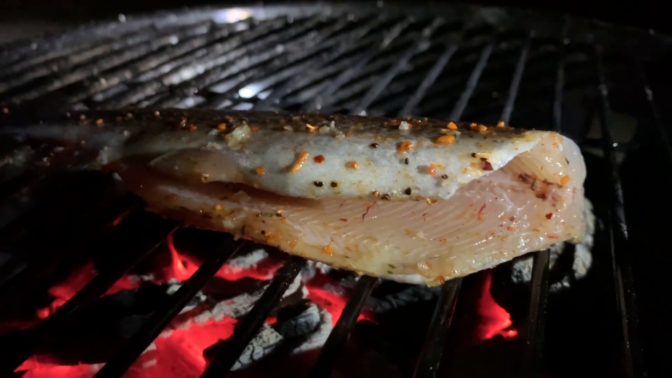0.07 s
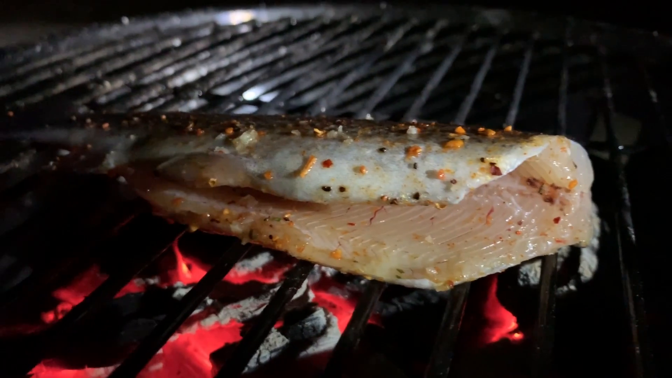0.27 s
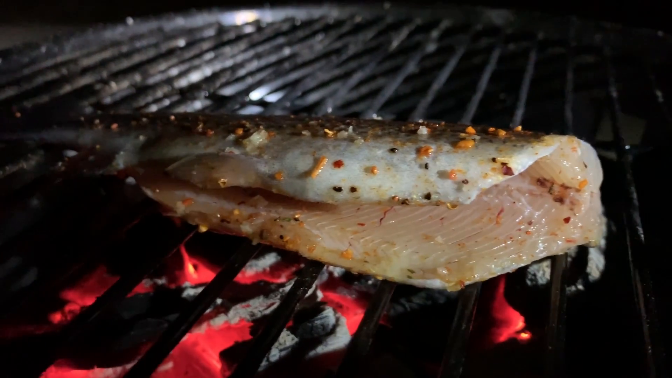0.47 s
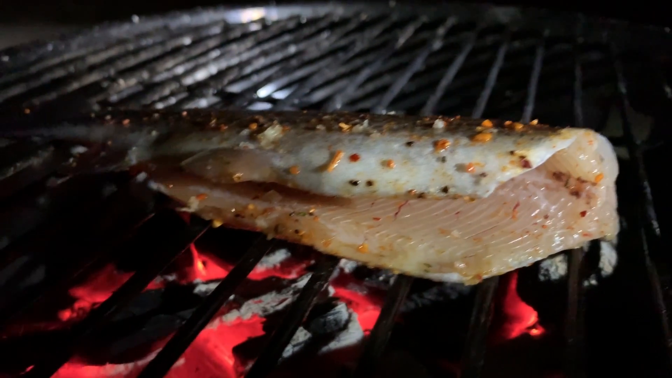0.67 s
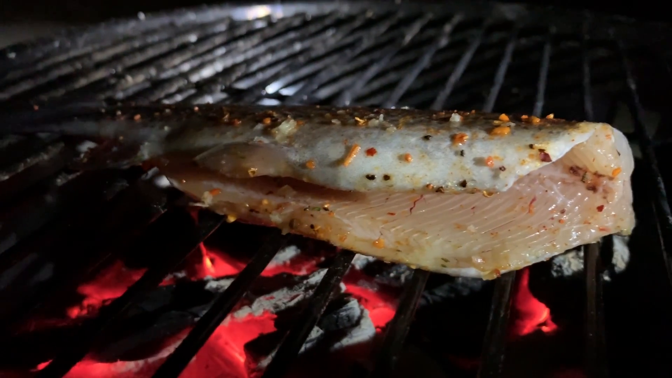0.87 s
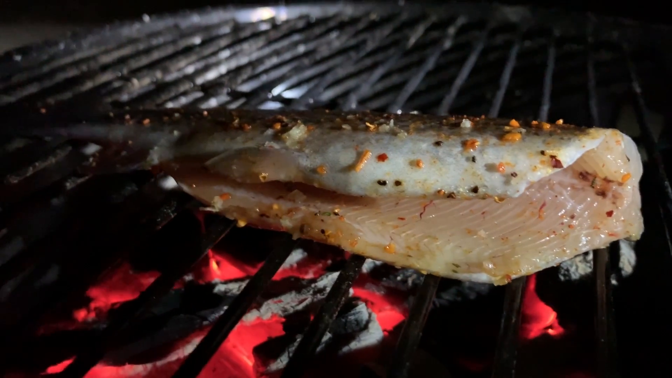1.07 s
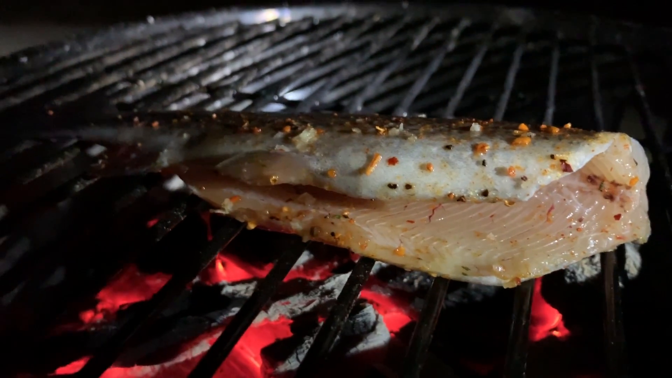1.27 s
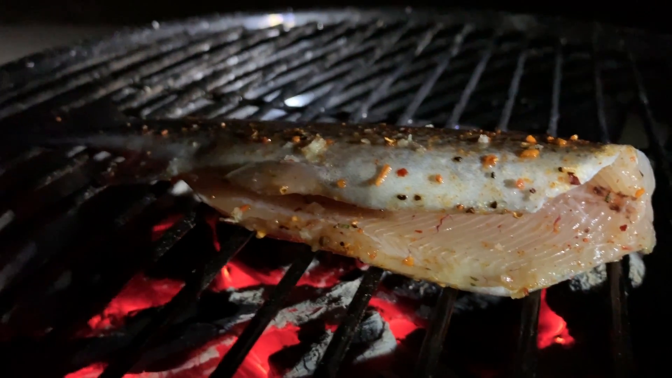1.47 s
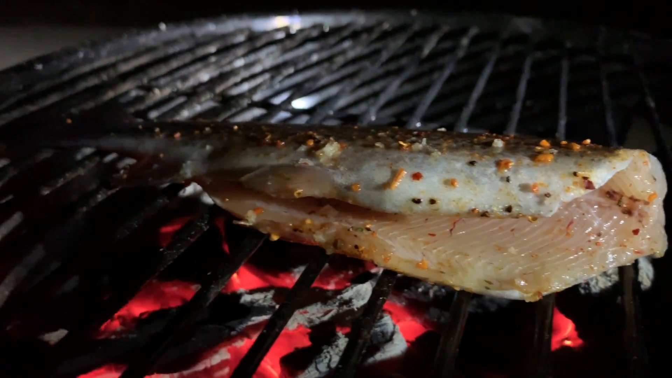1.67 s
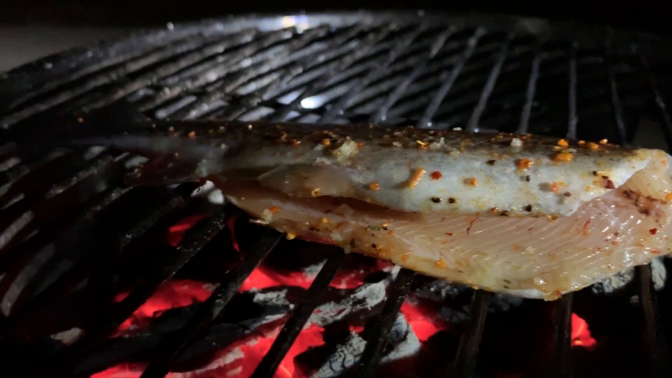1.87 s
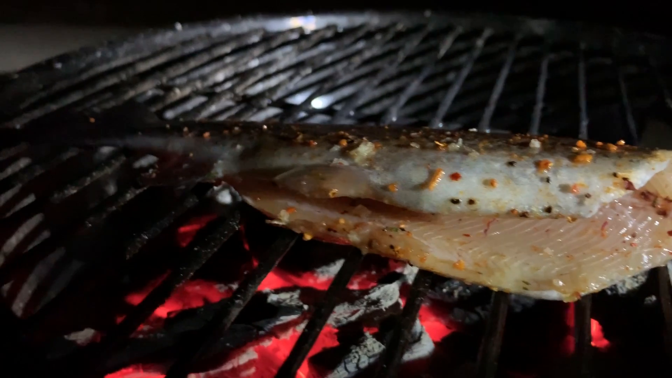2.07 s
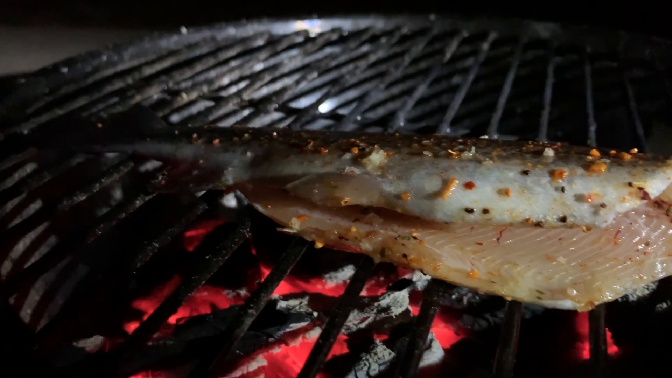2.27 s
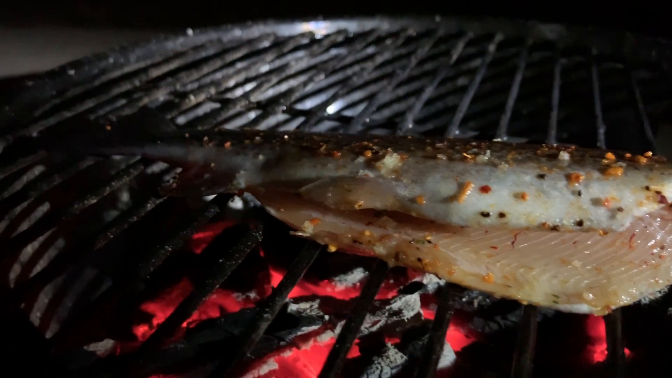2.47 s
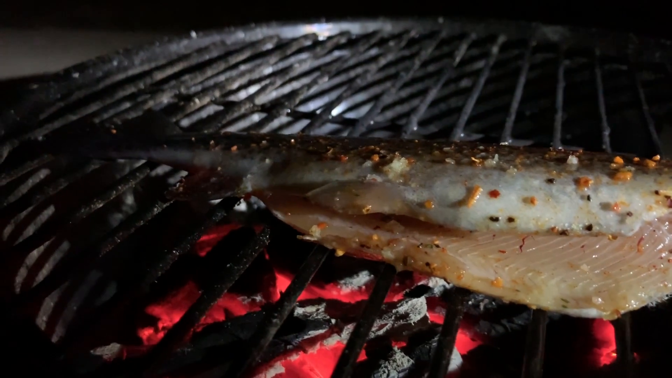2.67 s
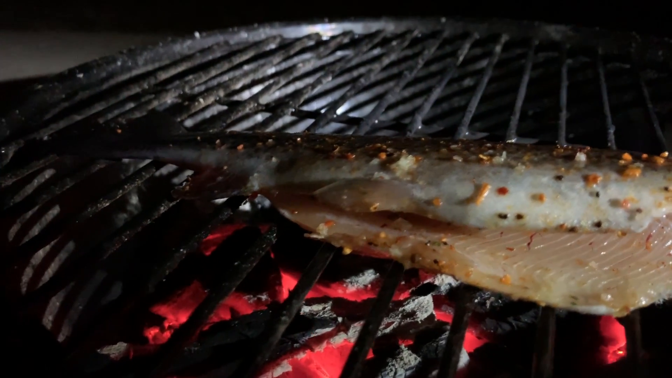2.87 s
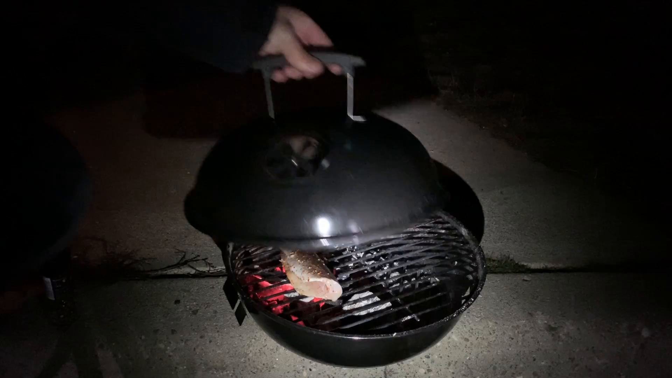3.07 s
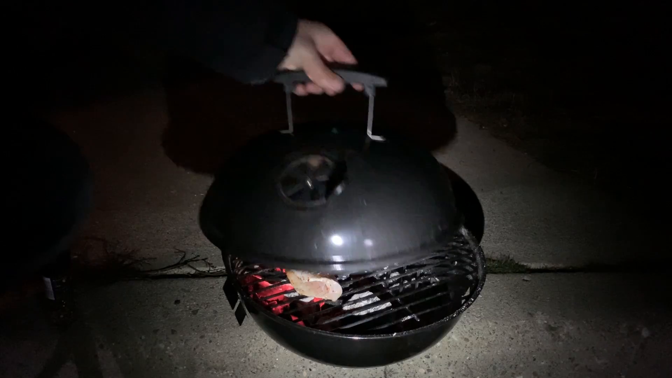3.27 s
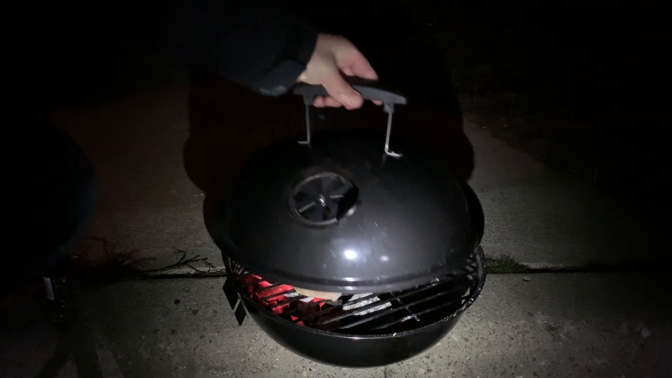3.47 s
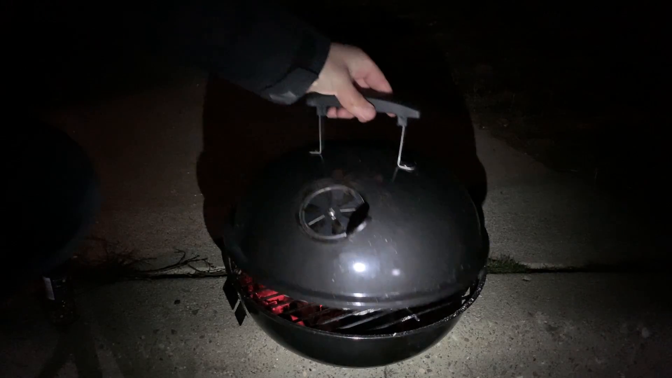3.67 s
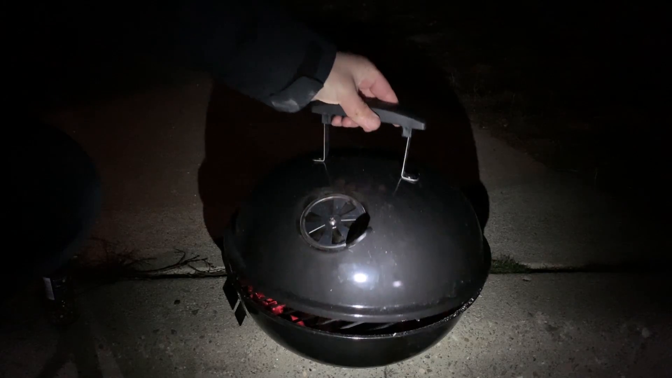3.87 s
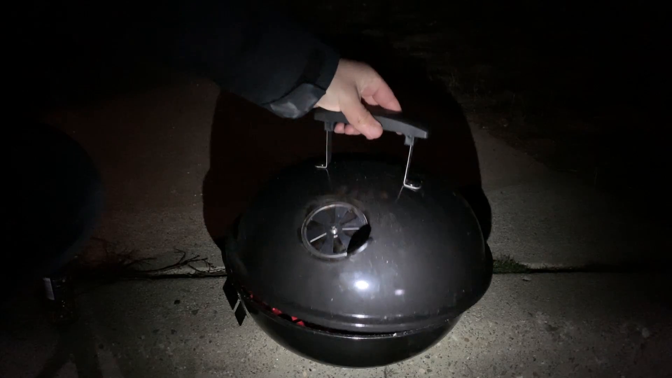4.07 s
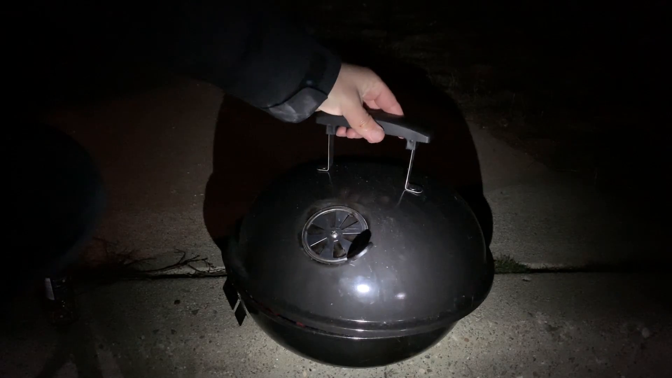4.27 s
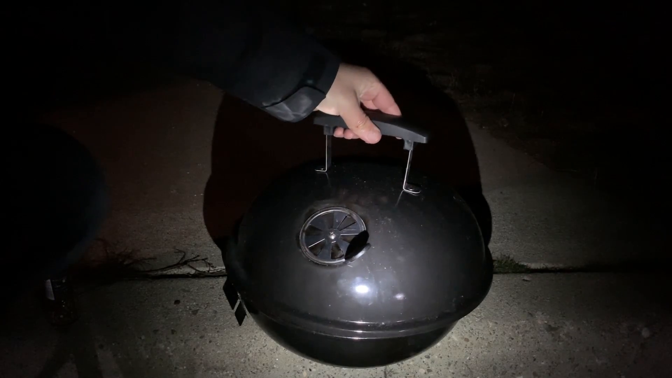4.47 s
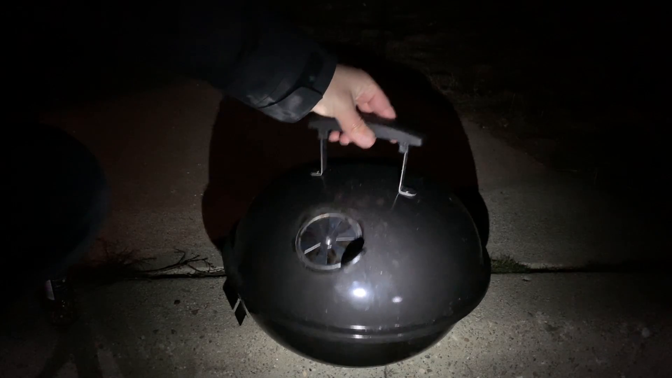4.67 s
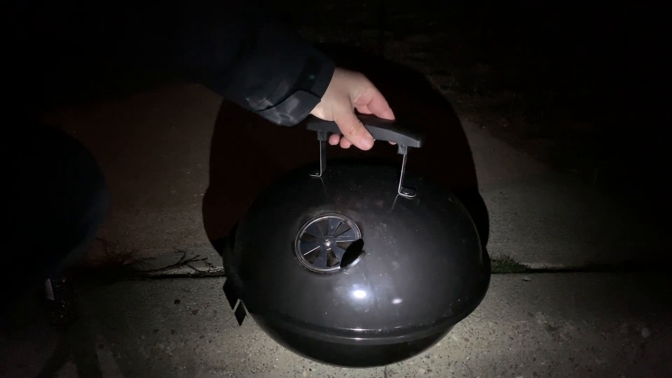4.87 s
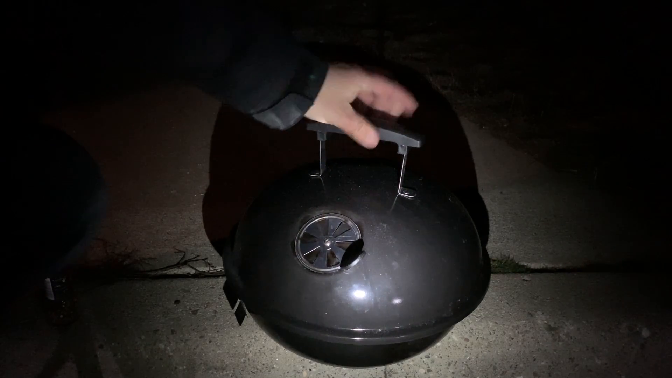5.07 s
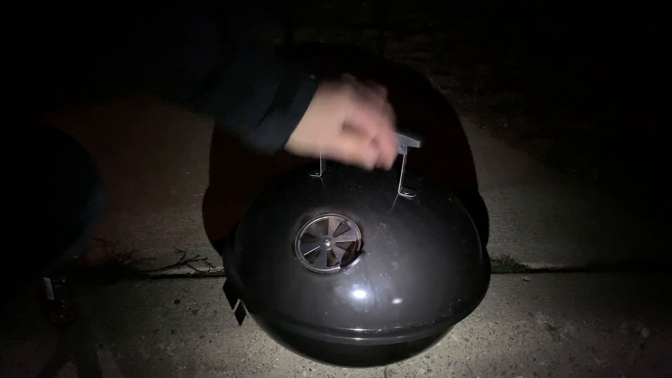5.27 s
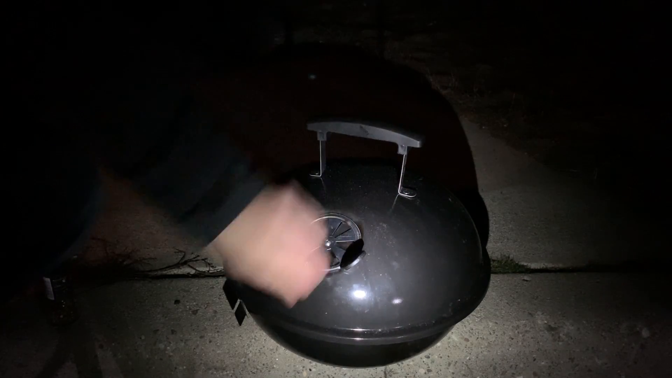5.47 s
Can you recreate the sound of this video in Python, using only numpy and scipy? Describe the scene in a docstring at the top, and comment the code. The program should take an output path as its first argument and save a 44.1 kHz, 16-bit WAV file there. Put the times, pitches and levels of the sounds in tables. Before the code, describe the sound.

Close over a charcoal grill, fish sizzles softly above a low gusty rumble, with scattered pops and one bright metallic ping. The sound then cuts to a quieter yard at night with a faint bird peeping. A sheet-steel lid clatters onto the bowl, chatters lightly, then drops shut with a loud hollow clang. Finally a sleeve rustles faintly. Stereo, outdoors.

```python
"""Night in a yard. Close over a kettle grill: coals and far traffic roar low (gusty noise), fish sizzles (hiss and
clicks in flickering bands), coals and fat pop (crowds of short rings) and the hot grate pings (modal rings).
Then, a step back, the sizzle gives way to night air and a small bird peeps (arched whistles). The sheet-steel lid
touches the bowl, scrapes along its rim and drops shut (modal blows, stick-slip clicks, a rise of low noise) over
low thuds of the bowl. Last, a sleeve rustles (enveloped noise and clicks)."""
import sys
import numpy as np
from scipy import signal
from scipy.fft import rfft, irfft
from scipy.io import wavfile
from scipy.ndimage import uniform_filter1d

SR = 44100
rng = np.random.default_rng(int(sys.argv[2]) if len(sys.argv) > 2 else 0)


def volts_from_decibels(level):
    """Turn decibel levels (scalar or array-like) into linear amplitude factors."""
    exponent = np.asarray(level, float) / 20
    return 10 ** exponent


def wav_out(sig):
    """Save sig, one row per channel (or a flat mono array), as 16-bit PCM at SR to the path in sys.argv[1]."""
    wavfile.write(sys.argv[1], SR, np.round(np.clip(np.atleast_2d(sig).T, -1, 1) * 32767).astype(np.int16))


N = 242991
T, HZ = np.arange(N) / SR, np.arange(N // 2 + 1) * SR / N
STEP_BACK_S, RIM_RESTS_S = 3.118, 4.455
TOP_HZ = 15750


def on_log(hz, table, column=1):
    """A table read along a log frequency axis."""
    table = np.array(table)
    return np.interp(np.log(hz + 1), np.log(table[:, 0]), table[:, column])


def colour(x, table, lo_hz, hi_hz):
    """Shape x by (Hz, dB) points; the louder stream gets rms 1 between lo and hi."""
    spectrum = rfft(x) * volts_from_decibels(on_log(HZ, table))
    in_band = (HZ > lo_hz) & (HZ < hi_hz)
    power = 2 * np.sum(abs(spectrum[..., in_band]) ** 2, axis=-1).max()
    return irfft(spectrum, N) * N / np.sqrt(power)


def walk(rate_hz):
    """Random levels held 1 / rate_hz and slewed twice; spread near 1."""
    hold = int(SR / rate_hz)
    steps = np.repeat(rng.standard_normal(N // hold + 1), hold)
    return 1.58 * uniform_filter1d(uniform_filter1d(steps, hold), hold)[:N]


def noise():
    """White noise: a shared and an unshared stream."""
    return rng.standard_normal((2, N))


def grains(rate_hz, spread_db):
    """Random clicks, a few much bigger than the rest; shared and unshared stream."""
    hits = rng.random((2, N)) < rate_hz / SR
    size = volts_from_decibels(spread_db * rng.exponential(size=(2, N)))
    return hits * size * rng.choice([-1, 1], (2, N))


def patchy(edges_hz, slow_db, slow_hz, quick_db, quick_hz, source):
    """Each band of the source swells and flickers on its own."""
    spectrum, out = rfft(source), 0
    for lo, hi in zip(edges_hz, edges_hz[1:]):
        band = irfft(spectrum * ((HZ >= lo) & (HZ < hi)), N)
        out = out + band * volts_from_decibels(slow_db * walk(slow_hz) + quick_db * walk(quick_hz))
    return out


def rings(hz, t60_s, length_s):
    """One fading sine per mode."""
    t = T[:int(length_s * SR)]
    fade = np.exp(-np.log(1000) * t / np.reshape(t60_s, (-1, 1)))
    return np.sin(2 * np.pi * np.outer(hz, t)) * fade


def swell_in(length_s, time_s):
    """Exponential onset over the first length_s."""
    return 1 - np.exp(-T[:int(length_s * SR)] / time_s)


def add(out, start_s, sound, peak_db):
    """Mix a sound in, its first stream scaled to the given peak."""
    i = int(start_s * SR)
    scaled = sound * volts_from_decibels(peak_db) / abs(sound[0]).max()
    out[:, i:i + sound.shape[1]] += scaled[:, :N - i]


def strokes(rows, attack_s, release_s):
    """Gain of rubbing strokes: quick start, level ramp, ever faster dying; 20 dB down after either time."""
    levels_db = []
    for start_s, end_s, start_db, end_db in rows:
        ramp_db = np.interp(T, [start_s, end_s], [start_db, end_db])
        early = np.maximum(start_s - T, 0) / attack_s
        late = np.maximum(T - end_s, 0) / release_s
        levels_db.append(ramp_db - 20 * (early + late ** 2))
    return volts_from_decibels(np.max(levels_db, axis=0))


# low noise colour at each listening place: (freq_hz, density_db_per_hz)
ROAR_NEAR_COLOUR = [(15, -34), (30, -2.5), (70, 1), (130, -2), (330, -9), (390, -7.5), (690, -20),
                    (1000, -30), (1340, -43.5), (3000, -58.5)]
ROAR_BACK_COLOUR = [(15, -28.5), (30, -0.5), (107, 1), (235, -8.5), (283, 0.5), (330, -12.5), (440, -10),
                    (700, -27), (1180, -42.5), (3000, -62)]
ROAR_NEAR_DB, ROAR_BACK_DB = -39.5, -45
LID_RUMBLE_S, LID_RUMBLE_DB, LID_RUMBLE_WIDTH_S = 4.7, 4, 0.42


def roar():
    """Coals and far traffic: gusty low noise; it rises once as the lid drags and drops shut, for its rumble."""
    gusts = patchy([15, 90, 180, 350, 700, 20000], 0.62, 3, 1.5, 30, noise())
    lid_rumble_db = LID_RUMBLE_DB * np.exp(-((T - LID_RUMBLE_S) / LID_RUMBLE_WIDTH_S) ** 2)
    near = colour(gusts, ROAR_NEAR_COLOUR, 40.7, 700) * volts_from_decibels(ROAR_NEAR_DB)
    back = colour(gusts, ROAR_BACK_COLOUR, 40, 700) * volts_from_decibels(ROAR_BACK_DB + lid_rumble_db)
    return np.where(T < STEP_BACK_S, near, back)


# sizzle colour: (freq_hz, density_db_per_hz)
FAT_COLOUR = [(900, -22.5), (1500, -11), (3000, -13.5), (4200, -8), (5500, -8.5), (7400, 0), (9700, -9),
              (11000, -13.5), (12200, -12.5), (15600, -23)]
SIZZLE_DB, SIZZLE_GROWS_DB, SIZZLE_GROWS_S = -62.5, 4.5, .2  # the fat heats up to a steady sizzle


def sizzle():
    """Dense bursting fat bubbles (clicks) over steam hiss, heard until the step back."""
    edges_hz = [500, 2000, 3200, 4500, 6000, 6800, 7600, 8500, 9600, 12000, 20000]
    fizz = patchy(edges_hz, 1.0, 4.5, 2.4, 60, noise() + 1.3 * grains(830, 3.2))
    level_db = SIZZLE_DB - SIZZLE_GROWS_DB * np.exp(-T / SIZZLE_GROWS_S)
    return np.where(T < STEP_BACK_S, colour(fizz, FAT_COLOUR, 6000, 9000) * volts_from_decibels(level_db), 0)


# pops of coal and fat: (start_s, level_db, centre_hz, spread_octaves)
POP_EVENTS = [(.1792, -50, 7680, .6), (.296, -52, 4890, .1), (.358, -39, 11800, 0.17),
              (.5632, -49, 1600, 0.32), (.831, -46.5, 7685, .1), (1.104, -53.5, 2175, .3),
              (1.2815, -41.5, 8600, 0.38), (1.3997, -42.5, 2350, 0.79), (1.6361, -42, 8140, 0.36),
              (1.7844, -37.5, 9500, 0.53), (1.9016, -30, 9500, .35), (1.9159, -40.5, 10800, 0.44),
              (2.0522, -48, 1400, 0.32), (2.0663, -28.5, 1130, .5), (2.5313, -38.5, 8710, .12),
              (2.5693, -36.5, 2400, 1.22), (2.9774, -33.5, 1600, 0.78), (3.1053, -46.5, 1524, 0.44),
              (3.114, -50.5, 2474, .9), (3.469, -54, 9500, 0.47), (3.506, -34, 9340, 0.42),
              (3.5813, -48, 8370, .3), (3.6377, -44, 1200, .45), (3.725, -44.5, 8866, 0.3),
              (3.7779, -41.5, 7500, .45), (3.7704, -58, 2500, .3), (3.7796, -55, 2532, 0.025),
              (5.3408, -42.5, 900, .3)]
# pop panning: (centre_hz, left_minus_right_db)
POP_LEAN = [(900, 6), (2400, 4), (9000, 2.5)]
POP_T60_S, POP_NARROW = 0.0091, 0.69  # t60 of a pop of spread 1; power by which narrower pops ring longer


def pops():
    """Each pop is a crowd of very short rings around its centre."""
    out, length_s = np.zeros((2, N)), .16
    for start_s, level_db, centre_hz, octaves in POP_EVENTS:
        t60_s = max(POP_T60_S / octaves ** POP_NARROW, .003)
        pan_db = on_log(centre_hz, POP_LEAN)
        offsets = np.linspace(-1.6, 1.6, num=24) + 0.167 * rng.standard_normal(24)
        tones_hz = centre_hz * 2 ** (octaves * offsets)
        size = rng.choice([-1, 1], 24) * rng.uniform(0.69, 1, 24) * np.sqrt(np.hanning(24))
        size = size * (tones_hz < TOP_HZ)
        pop = size @ rings(tones_hz, np.full(24, t60_s), length_s) * swell_in(length_s, 0.00036)
        add(out, start_s, pop * volts_from_decibels([[pan_db / 2], [-pan_db / 2]]), level_db - pan_db / 2)
    return out


# grate modes: (mode_hz, level_db, t60_s)
GRATE_MODES = [(2330, -6, 0.0953), (3996, -19, 0.11), (5430, -6, 0.1), (6990, 1, 0.0458),
               (7500, -6.5, 0.06), (9740, -4, 0.05), (12200, -5, 0.03), (13850, -14.5, 0.018)]
# grate pings: (start_s, level_db, tilt_db_per_octave)
PING_EVENTS = [(1.093, -36.5, 9), (1.156, -44, 8.5), (1.8475, -40, 7.5), (2.411, -14, 1.6),
               (2.722, -43.5, 13), (5.143, -53, -4.5)]


def grate():
    """Hot bars slip and ping; the slip lasts a moment, so the ring swells in."""
    out, length_s = np.zeros((2, N)), .2
    hz, mode_db, t60_s = np.transpose(GRATE_MODES)
    bank = rings(hz, t60_s, length_s) * swell_in(length_s, 0.00014)
    for start_s, level_db, tilt_db in PING_EVENTS:
        size = volts_from_decibels(mode_db + tilt_db * np.log2(hz / 5000) + rng.standard_normal(len(hz)))
        signs = [np.ones(len(hz)), rng.choice([-1, 1], len(hz))]
        add(out, start_s, size * signs @ bank, level_db)
    return out


# night air colour: (freq_hz, density_db_per_hz)
AIR_COLOUR = [(900, 3), (2000, -8.5), (3400, -8.5), (5400, -11.5), (7500, -9), (9500, -4.5), (11000, -9),
              (13000, -11.5), (15600, -11.5)]
AIR_DB = -71.5


def night_air():
    """Faint coloured noise, slowly wavering, heard from the step back on."""
    air = colour(noise(), AIR_COLOUR, 900, 16000) * volts_from_decibels(AIR_DB + 1.9 * walk(4))
    return np.where(T < STEP_BACK_S, 0, air)


# bird notes, close ones run together: (crest_s, crest_hz, rise_s, fall_s, level_db)
PEEP_NOTES = [(3.165, 4650, 0.037, 0.14, -69.5), (3.45, 4330, .045, 0.035, -74.5),
              (3.542, 4650, 0.036, .07, -71.5), (3.592, 4600, 0.073, .088, -68),
              (3.852, 4375, .045, .04, -75), (3.946, 4630, .034, .056, -70), (4.004, 4680, .04, 0.07, -69)]
SLACK_HZ, ONSET_DB, FADE_DB = 3850, 58, 24  # each arc leaves and returns to the slack pitch, softer at its ends


def bird():
    """Thin arched whistles with a faint octave below, shifted in phase between left and right."""
    crest_s, crest_hz, rise_s, fall_s, level_db = np.transpose(PEEP_NOTES)[:, :, None]
    rising = T < crest_s
    arc = np.minimum(((T - crest_s) / np.where(rising, rise_s, fall_s)) ** 2, 4)
    hz = np.maximum((crest_hz - (crest_hz - SLACK_HZ) * arc).max(axis=0), SLACK_HZ)
    note_db = (level_db - np.where(rising, ONSET_DB, FADE_DB) * arc ** 2).max(axis=0)
    loud = volts_from_decibels(note_db + 1.5 * walk(60))
    phase = 2 * np.pi * np.cumsum(uniform_filter1d(hz, size=300)) / SR
    apart_rad = np.array([[-.45], [.45]])
    octave_below = volts_from_decibels(-13.0) * np.sin(phase / 2 + 2.4 * apart_rad)
    return np.sqrt(2) * loud * (np.sin(phase + apart_rad) + octave_below)


# lid modes: (mode_hz, loose_db, shut_db, loose_t60_s)
LID_MODES = [(518, -11.5, -8, 0.041), (795, -4.5, -2.5, 0.13), (1132, -11.5, -10.5, 0.12),
             (1265, -11, -23, .5), (1326, -7.5, -13.5, 0.548), (1492, -6.5, -9, .2),
             (1578, -0.5, -1.5, 0.15), (1804, -0.5, -7.5, 0.22), (1875, 1, -3.5, 0.2),
             (2038, -4.5, -2.5, 0.15), (2445, 4, -5, 0.18), (2499, -7.5, -3, 0.17),
             (2788, -14.5, -9.5, 0.47), (2960, -6, -9, 0.3), (3104, -22, -11.5, 0.29),
             (3280, -14.5, -16, .2), (3420, -12.5, -17.5, 0.15), (3840, -11, -8.5, .2),
             (3920, -13, -8, .25), (4386, -6.5, -7.5, 0.3), (4720, -13, -13.5, .2),
             (5122, -12, -12.5, 0.22), (6200, -17.5, -11, .16), (6710, -10.5, -1, .14),
             (7540, -6, -11, 0.15), (7880, -4.5, -4.5, 0.22), (7860, -6, -7.5, 0.12), (7980, -10.5, -8, .2),
             (8691, -15.5, -9, 0.143), (9120.8, -17, -7.5, .2)]
# crowd of unresolved sheet modes: (freq_hz, level_db, loose_t60_s, shut_t60_s)
SHEET_CROWD = [(350, -6.5, 0.064, .1), (900, -13, 0.09, 0.12), (1600, -12, 0.25, 0.15),
               (2760, -13.5, 0.147, 0.18), (4050, -14, .2, 0.15), (5740, -21.5, 0.2, 0.19),
               (7500, -13, 0.16, 0.12), (9500, -19, .2, .19), (10600, -23, 0.15, 0.15),
               (11961, -27, 0.19, 0.13), (15500, -35, .18, .16)]
# blows of rim on bowl: (start_s, level_db, tilt_db_per_octave)
RIM_BLOWS = [(4.1701, -19, -3), (4.193, -11.5, -0.8), (4.1996, -10.5, 0.5), (4.204, -9, -2.3),
             (4.222, -8.5, 0), (4.241, -12.5, -1), (4.256, -25, -6.5), (4.273, -23, -0.3),
             (4.4566, -42.5, 1.5), (4.486, -44.5, 1.5), (4.5419, -36, 3), (4.5624, -34, 1.4),
             (4.6057, -30.5, -1.5), (4.6365, -24.5, 6), (4.71, -26, 5.5), (4.7178, -15.5, -3),
             (4.723, -2, 2.5), (4.7264, -3, -5.5)]
# rim dragging or chattering on the bowl: (start_s, end_s, start_db, end_db)
RIM_SCRAPES = [(4.196, 4.243, -20.5, -20.5), (4.47, 4.715, -61, -43.5), (4.725, 4.742, -28.5, -22)]


def lid():
    """Blows and scraping ring the sheet; once the rim rests, friction sets how soon every mode dies."""
    out = np.zeros((2, 2, N))  # loose or shut, stream, sample
    named_hz, loose_db, shut_db, named_t60_s = np.repeat(LID_MODES, 2, axis=0).T
    # the dome is not quite round, so each mode is a close pair that beats
    named_hz = named_hz * (1 + .004 * rng.standard_normal(len(named_hz)))
    crowd_hz = np.linspace(400, 15600, num=700) + 30 * rng.standard_normal(700)
    hz = np.r_[named_hz, crowd_hz]
    crowd_t60_s = on_log(crowd_hz, SHEET_CROWD, column=2) * rng.uniform(.6, 1.2, 700)
    loose_t60_s = np.r_[named_t60_s, crowd_t60_s]
    shut_scatter = np.r_[np.full(len(named_hz), 1.18), rng.uniform(.6, 1.2, 700)]
    shut_t60_s = on_log(hz, SHEET_CROWD, column=3) * shut_scatter
    crowd_db = on_log(crowd_hz, SHEET_CROWD)
    sizes = [volts_from_decibels(np.r_[db - 4.5, crowd_db]) for db in (loose_db, shut_db)]
    banks = rings(hz, loose_t60_s, 0.27), rings(hz, shut_t60_s, .3)

    def ring(shut, tilt_db):
        """Every contact point excites the modes in its own mixture."""
        mix = rng.choice([-1, 1], (2, len(hz))) * volts_from_decibels(1.3 * rng.standard_normal((2, len(hz))))
        return mix * sizes[shut] * volts_from_decibels(tilt_db * np.log2(hz / 3000)) @ banks[shut]

    for start_s, level_db, tilt_db in RIM_BLOWS:
        shut = int(start_s > RIM_RESTS_S)
        body = ring(shut, tilt_db)
        # a light touch rolls in more slowly than a hard blow
        roll_s = 0.00016 * volts_from_decibels(-.6 * level_db)
        add(out[shut], start_s, body * (1 - np.exp(-T[:body.shape[1]] / roll_s)), level_db)
    # stick-slip clicks round the rim: several streams, each with its own mixture
    drag = strokes(RIM_SCRAPES, attack_s=.004, release_s=.046)
    for _ in range(4):
        slips = grains(300, 2.4)[0]
        slips = slips / slips.std() * drag / 2
        for shut, part in enumerate((T < RIM_RESTS_S, T >= RIM_RESTS_S)):
            body = ring(shut, 0.93)
            body = body / np.sqrt(np.sum(body[0] ** 2))
            out[shut] += signal.oaconvolve(slips[None] * part, body, axes=1)[:, :N]
    damping = np.exp(-np.maximum(T - RIM_RESTS_S, 0) / 0.043)
    return out[0] * damping + out[1]


# low thuds of the air in the bowl: (start_s, level_db, pitch_hz)
BOWL_THUDS = [(4.1735, -13.5, 239), (4.1912, -10, 254), (4.2045, -8.5, 178.7), (4.2347, -12, 267),
              (4.2559, -17, 340), (4.268, -14, 229), (4.286, -18.5, 258.6), (4.573, -29, 189.5),
              (4.605, -19.5, 288), (4.7265, 1.5, 179), (4.8938, -32.5, 151)]
THUD_SWELL_S = .0045
SHELL_HZ, SHELL_DB, SHELL_LATE_S, SHELL_SWELL_S = 229, -8.5, .011, .008
SHELL_SHARE = 0.27  # extra dB of shell ring per dB of thud: hard thuds shake it most


def bowl():
    """The trapped air, then the shell, answer each push with a few low swings that swell and die."""
    out, t = np.zeros((2, N)), T[:4000]

    def swings(hz, swell_s):
        """A tone under a swelling, dying envelope, weaker and later in the unshared stream."""
        envelope = t / swell_s * np.exp(1 - t / swell_s - (t / (2.8 * swell_s)) ** 2)
        swing = np.sin(2 * np.pi * hz * t) * envelope
        return np.array([swing, np.roll(swing, 40) * 0.65])

    for start_s, level_db, pitch_hz in BOWL_THUDS:
        shell_db = SHELL_DB + (1 + SHELL_SHARE) * level_db
        add(out, start_s, swings(pitch_hz, THUD_SWELL_S), level_db)
        add(out, start_s + SHELL_LATE_S, swings(SHELL_HZ, SHELL_SWELL_S), shell_db)
    return out


# sleeve brushes: (start_s, end_s, start_db, end_db)
SLEEVE_BRUSHES = [(5.065, 5.13, -82, -78), (5.145, 5.2, -67, -70.5), (5.33, 5.42, -78, -68.5),
                  (5.45, 5.52, -65.5, -62.5)]
# cloth colour: (freq_hz, density_db_per_hz)
CLOTH_COLOUR = [(700, 7.5), (2000, -2), (4000, -4.5), (5600, -8), (7800, 1.5), (10500, -12), (12500, -11),
                (15600, -22)]


def sleeve():
    """Rubbing cloth: coloured noise and clicks under the strokes' gain."""
    cloth = colour(noise() + 1.9 * grains(600, 3.3), CLOTH_COLOUR, 6250, 7800)
    return cloth * strokes(SLEEVE_BRUSHES, attack_s=.012, release_s=0.061)


# stereo likeness of the whole chain, before the power far: (freq_hz, likeness_0_to_1)
STEREO_LIKENESS = [(100, 0.9903), (400, 0.9315), (800, 0.83), (1400, 0.41), (2800, 0.36), (4000, 0.41),
                   (5000, 0.41), (6200, 0.92), (7000, 0.95), (7500, 1), (8900, 0.89), (10000, 0.98),
                   (11000, 1), (12200, 0.24), (13200, 1), (14400, 0.796), (15500, .5)]


def spread(pair, far):
    """Left and right from a shared stream and an unshared one; a higher far makes them less alike."""
    alike = np.clip(on_log(HZ, STEREO_LIKENESS), 0, 1) ** far
    mid, side = rfft(pair) * np.sqrt([(1 + alike) / 2, (1 - alike) / 2])
    return irfft([mid + side, mid - side], N)


def scene():
    """Wide sounds are spread over left and right; pops and the bird come from one spot."""
    wide = spread(roar() + sizzle() + night_air() + sleeve(), far=3.4)
    metal = spread(grate() + lid() + bowl(), far=0.76)
    return wide + metal + pops() + bird()


# stereo phase of the whole chain, right ahead of left: (freq_hz, lead_half_turns)
STEREO_PHASE = [(0, 0), (4500, 0), (5300, -1), (6500, -.3), (7100, 0), (7500, .03), (9900, .95),
                (11000, 1.03), (13000, 1.97), (14300, 2.03), (15800, 2.8)]
# stereo level: (freq_hz, left_minus_right_db)
STEREO_LEAN = [(500, 0), (1200, 3), (1800, 1), (2500, 2.5), (4000, 1), (5800, -1.5), (7000, 0)]


def stereo_image(dry):
    """Sets left and right apart in level and phase by frequency, for the whole chain and not the ports alone."""
    phase = np.exp(.5j * np.pi * np.interp(HZ, *np.transpose(STEREO_PHASE)))
    turn = phase / volts_from_decibels(on_log(HZ, STEREO_LEAN) / 2)
    return irfft(rfft(dry) * [1 / turn, turn], N)


def roll_off(x):
    """The treble ends steeply here."""
    return signal.sosfilt(signal.butter(12, 15740, fs=SR, output="sos"), x)


def record(dry):
    """Left and right are set apart; peaks past full scale clip; the top is cut."""
    clipped = np.clip(stereo_image(dry), -1, 1)
    lowpass = signal.ellip(8, .2, 60, TOP_HZ, fs=SR, output="sos")
    mix = signal.sosfilt(lowpass, clipped)
    return roll_off(mix)


dry = scene()
out = record(dry)
wav_out(out)
```